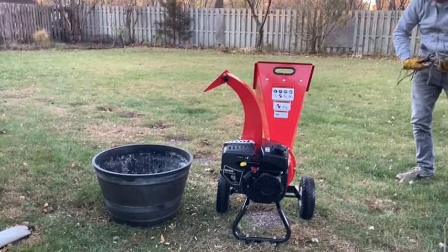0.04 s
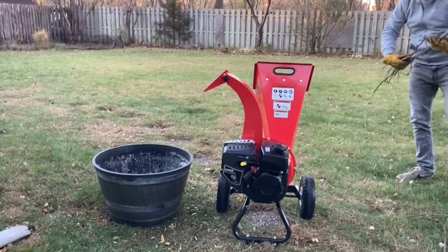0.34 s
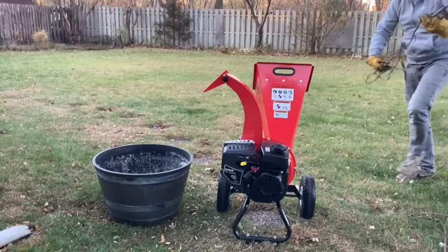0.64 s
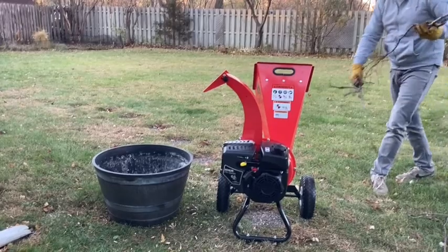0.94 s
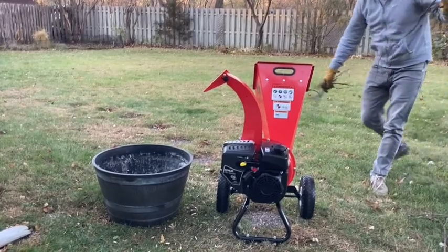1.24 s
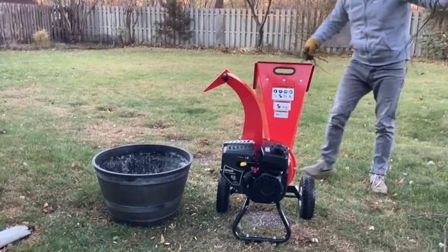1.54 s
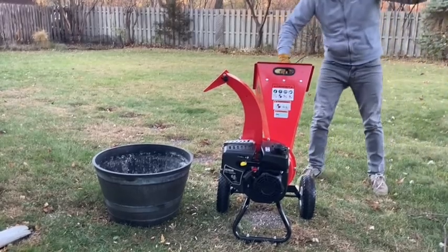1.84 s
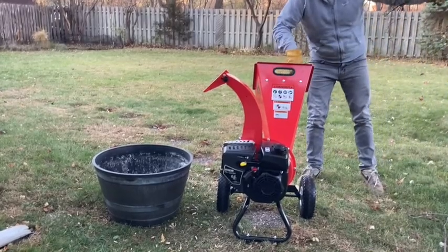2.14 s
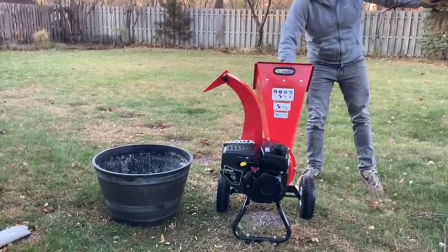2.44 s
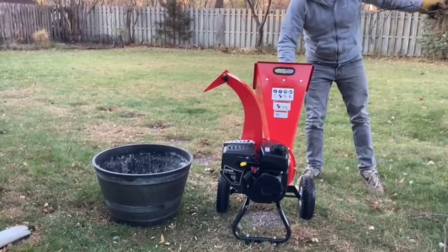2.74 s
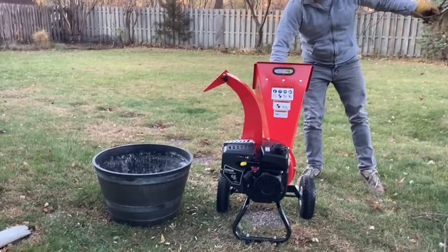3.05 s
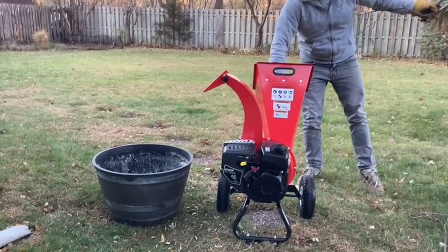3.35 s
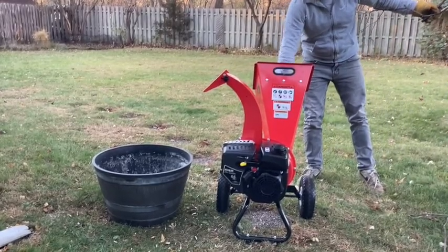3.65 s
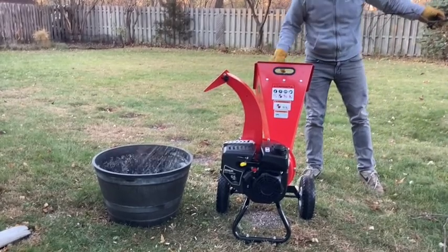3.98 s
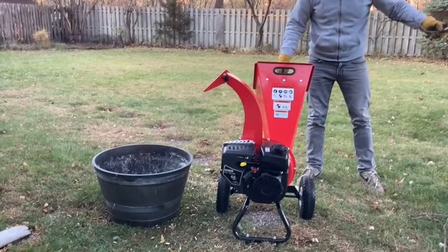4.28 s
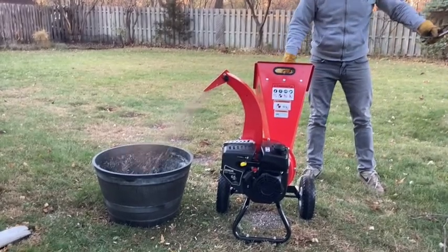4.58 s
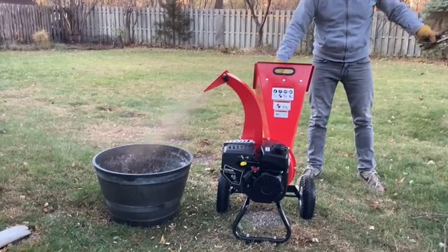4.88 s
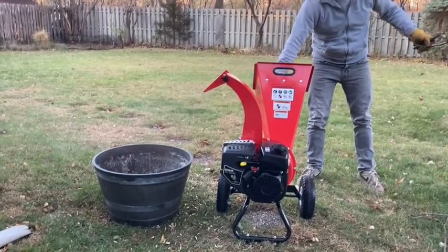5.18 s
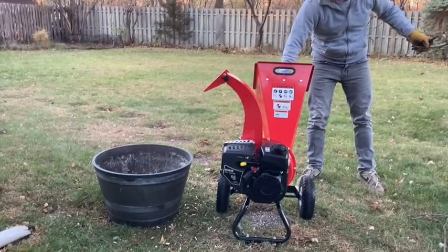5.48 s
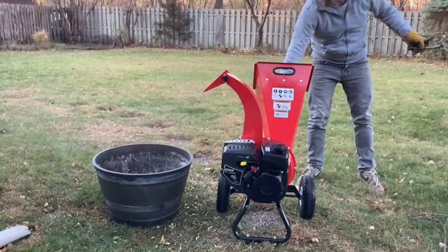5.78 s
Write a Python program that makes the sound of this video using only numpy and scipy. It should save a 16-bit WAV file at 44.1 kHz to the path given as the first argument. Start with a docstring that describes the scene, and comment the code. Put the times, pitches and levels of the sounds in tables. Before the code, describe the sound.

A small petrol wood chipper drones steadily, then cracks and shreds twigs in loud bursts, spraying chips through its steel chute.

```python
"""First comes the steady drone of a small single-cylinder petrol wood chipper, out on a lawn a few metres
from a two-port microphone. Shaft tones, rotor hum, rattling panels, valve ticks and hissing air all keep
time with one shaft. From about 3.7 s twigs go down the hopper: the knives crack and shred them, thick
ends knock in the housing, and chips spray and clang out through the steel chute. The engine sags under
the bites until the governor catches up, and the drone sinks after the heavy ones."""
import sys
import numpy as np
from scipy import signal
from scipy.fft import rfft, irfft
from scipy.io import wavfile

SR = 44100
rng = np.random.default_rng(int(sys.argv[2]) if len(sys.argv) > 2 else 0)


def digitize_waveform(pressure):
    """Quantize a signal to 16-bit integers and store it at the path in sys.argv[1].

    Rows of a 2-D input are taken as channels; values are limited to [-1, 1].
    """
    field = np.atleast_2d(pressure).T
    bounded = np.clip(field, -1, 1)
    quanta = np.round(bounded * 32767).astype(np.int16)
    wavfile.write(sys.argv[1], SR, quanta)


N = 265482
TIME, HZ = np.arange(N) / SR, np.fft.rfftfreq(N, 1 / SR)
GOVERNED_HZ = 64.03  # shaft turns a second

# Levels in the tables are relative: each layer and the microphone add their own gain.
# the governor hunts a little: t/s, offset from the governed speed/Hz
HUNTING = [(0, 0), (1.1, -.22), (1.35, .1), (2.7, .08), (3.0, 0)]
# rise and fall of the drone: t/s, level/dB
DRONE_LEVEL = [(0.0, -37), (0.03, -35), (3.72, -35), (3.87, -41), (3.95, -40.7), (4.05, -39), (4.13, -39.3),
               (4.17, -37.3), (4.24, -36.5), (4.29, -40.3), (4.5, -40.7), (4.6, -43.8), (5.36, -44),
               (5.43, -41), (5.65, -38.7), (6.02, -40)]
# tones of the shaft: multiple of shaft speed, level/dB
SHAFT_ORDERS = [(0.5, -62), (1, -40.3), (1.5, -47.7), (2, -43.4), (2.5, -41), (3, -51), (3.5, -58),
                (4, -38.2), (4.5, -57.5), (6.5, -58), (7.5, -57), (8.5, -58.5), (9, -59), (9.5, -53.5),
                (10, -46.6), (11.5, -61), (12, -57), (13, -60), (13.5, -60), (15, -49.8), (16, -45),
                (17, -63), (18, -50), (18.5, -62), (19, -59), (19.5, -60.5), (20, -56), (21, -59),
                (22.5, -59.5), (23, -62), (24, -58.5), (24.5, -58.5), (27, -51.5), (31, -67), (33, -60.5),
                (38, -63.5), (42, -67), (49.5, -68), (51.5, -70), (57, -67)]
# the rotor's hum swells and fades: t/s, level at 6 times shaft speed/dB, level at 8 times/dB
ROTOR_HUM = [(0, -42.5, -44.5), (0.3, -44.5, -43.5), (0.62, -49, -40.5), (0.85, -42.5, -41.5),
             (1.0, -40, -45.5), (1.12, -42.5, -46.5), (1.3, -39, -44), (1.55, -43, -40.5),
             (1.77, -44, -39.5), (1.87, -50.5, -39.5), (2.3, -58, -40.5), (3.0, -55, -41.5),
             (3.6, -51.5, -41.5), (3.95, -56.5, -46.5), (4.2, -48.5, -41.5), (4.65, -58.5, -50.5),
             (4.9, -58.5, -48.5), (5.15, -55.5, -42), (5.4, -55.5, -41), (5.7, -52.5, -43.5),
             (6.02, -56.5, -45.5)]
# spectrum of the rattling bodywork: f/Hz, level/dB
CLATTER_SPECTRUM = [(20, -53), (40, -15), (65, -8), (160, -4.5), (230, -5), (310, -10), (380, -6.5),
                    (470, -0.5), (600, -6.5), (850, -8.5), (1100, -11.5), (1600, -12.5), (2600, -22),
                    (3300, -19.5), (4600, -28), (9000, -32)]
# ringing of loose panels and guards: f/Hz, width/Hz, peak/dB
PANEL_MODES = [(1000, 110, 4), (1500, 260, 3), (2010, 140, 4.5), (2420, 130, 5.5)]
# ticks of valves and piston: place in the four-stroke cycle/cycles, level/dB
VALVE_TICKS = [(.02, -3), (.3, -5), (.43, -2), (.62, -2), (.67, 1), (.8, 0), (.89, -3)]
# spectrum of the air leaving the chute: f/Hz, level/dB
AIR_SPECTRUM = [(1500, -10.5), (4500, -3), (7000, -1), (8000, -4.5), (8650, 2.5), (9300, 3), (11500, -0.5),
                (13000, -0.5), (15800, -3)]
# bites of wood, heavy and light: t/s, length/s, spray/dB, cutting/dB, drumming/dB, drag on the shaft/Hz
BITES = [(3.656, 0.033, -39.5, -39, -53, 0), (3.694, 0.13, -28, -38, -39.5, 2),
         (3.851, 0.019, -33, -38.5, -48, .5), (3.885, 0.17, -44, -49, -57, -0.5),
         (4.081, 0.081, -35.5, -37.5, -47, 0), (4.135, 0.031, -28, -34, -36.5, 2.5),
         (4.186, 0.0757, -30.5, -36.5, -36.5, 3), (4.277, 0.071, -33.5, -38, -46, 1.45),
         (4.378, 0.071, -29.5, -35.5, -44.5, 1.45), (4.502, 0.063, -28, -35, -42, 2),
         (4.617, 0.059, -34, -43, -53, 0.5), (4.672, 0.081, -28, -35, -49, 3),
         (5.529, 0.094, -44.5, -52, -69, 0.5), (5.644, 0.16, -41, -46.5, -62, 0),
         (5.771, 0.059, -29, -34.5, -43.5, 1.2), (5.862, 0.039, -28, -32.5, -50, 0),
         (5.927, 0.042, -35.5, -40, -56.5, 1.5)]
# stray chips fly out in small puffs: t/s, level/dB
STRAY_CHIPS = [(3.955, -41), (4.97, -37.5), (5.06, -41), (5.31, -42.5)]
# spectra of spraying chips, cutting knives and the drumming housing: f/Hz, level/dB
SPRAY_SPECTRUM = [(1200, -41), (3500, -8), (6000, 3), (7000, 3.5), (8000, 3.5), (10500, 5.5), (11500, 3.5),
                  (14000, 3), (15800, -2.5)]
CUTTING_SPECTRUM = [(300, -39), (900, -4.5), (1500, -1.5), (2300, 0.5), (3400, 2), (4600, -3), (8000, -13)]
DRUMMING_SPECTRUM = [(30, -35), (70, -14), (150, -4), (250, -3), (350, -4), (480, -.5), (750, -3.5),
                     (1100, -7), (2200, -22)]
# ringing of the steel chute and hopper: f/Hz, width/Hz, peak/dB
STEEL_MODES = [(1480, 110, 6.5), (1640, 100, 4), (1950, 120, 3.5), (2110, 100, 4), (2400, 150, 2.5),
               (3180, 45, 9), (3430, 90, 6.5), (3660, 70, 5), (4120, 60, 5.5), (4710, 80, 3),
               (7800, 300, 5), (8600, 200, 2.5)]
# the hollow of the rotor housing: f/Hz, width/Hz, peak/dB
HOUSING_MODES = [(505, 55, 6), (440, 90, 1.5)]
# thick ends of wood knock in the housing: t/s, level/dB
KNOCKS = [(3.696, -20), (3.733, -26), (4.19, -31), (4.204, -24), (4.225, -32), (4.258, -20), (4.29, -28)]
# twigs snap on the knives: t/s, splinters/dB, crack/dB, ring f/Hz, ring level/dB
SNAPS = [(3.697, -31, -33, 2330, -33), (3.7397, -23, -33, 1385, -31), (3.766, -28, -35, 3450, -37),
         (3.782, -28, -35, 2370, -40), (3.7955, -32, -40, 1306, -30), (3.821, -22, -35, 2100, -40),
         (4.129, -28, -34, 1376, -23), (4.139, -24.5, -26.5, 1454, -28), (4.165, -31, -26, 1745, -31),
         (4.231, -20, -35, 2160, -33), (4.287, -19, -33, 2190, -32), (4.366, -18, -27, 1530, -32),
         (4.386, -29, -30, 3570, -35), (4.438, -30, -29, 1576, -26.5), (4.489, -19, -32, 3150, -38),
         (4.5183, -29, -35, 985, -27), (4.556, -31, -38, 1453, -28), (4.565, -19.5, -30, 3480, -29),
         (4.6982, -26, -29, 1474, -29.5), (4.721, -29, -33, 1510, -31), (4.742, -30, -31, 2020, -33),
         (5.7654, -24, -39, 1630, -37), (5.8072, -29, -31, 2400, -25), (5.814, -37, -35.5, 1646, -30),
         (5.875, -22, -37, 1560, -29), (5.8825, -34, -31, 2064, -27.5), (5.906, -26, -31, 1580, -37)]
# chunks of wood strike the chute: t/s, level/dB
CLANGS = [(4.37, -38), (4.438, -37), (4.492, -40), (4.529, -33), (4.567, -24), (4.728, -27), (5.772, -42),
          (5.904, -40)]
# phase between the microphone's ports below the treble: f/Hz, lead of the left/rad
PORT_PHASE = [(40, -.2), (150, -.14), (330, -.25), (520, -.78), (1000, -.6), (2000, -.95), (3000, -1.55),
              (4000, -1.7), (5200, -2.4), (6320, -3)]
# balance of the ports: f/Hz, left minus right/dB
PORT_BALANCE = [(60, 2.5), (110, 1.5), (200, .4), (380, 1.1), (700, -.7), (1200, -1.8), (2400, -1.4),
                (4400, -.5), (8000, 0)]


def amp(db):
    """Decibels to gain."""
    return 10 ** (np.asarray(db) / 20)


def unit_rms(x):
    """Scales to an rms of 1."""
    return x / np.sqrt(np.mean(x ** 2) + 1e-20)


def over_time(rows):
    """The columns of a table in time, one value a sample."""
    times, *columns = np.transpose(rows)
    return [np.interp(TIME, times, column) for column in columns]


def over_frequency(points):
    """A table over frequency, one value a bin."""
    hz, value = np.transpose(points)
    return np.interp(np.log(HZ + 1), np.log(hz + 1), value)


def colour(x, spectrum, modes=()):
    """A causal filter of unit power gain: a broad spectrum with resonances on top."""
    peaks_db = sum(peak / (1 + (2 * (HZ - hz) / width) ** 2) for hz, width, peak in modes)
    log_gain = np.log(unit_rms(amp(over_frequency(spectrum) + peaks_db)))
    minimum_phase = -signal.hilbert(np.r_[log_gain, log_gain[-2:0:-1]]).imag[:len(HZ)]
    return irfft(rfft(x) * np.exp(log_gain + 1j * minimum_phase), N)


def wander(rate_hz):
    """A smooth random drift with an rms of 1."""
    return unit_rms(irfft(rfft(rng.standard_normal(N)) / (1 + (HZ / rate_hz) ** 4), N))


def throb(cycles, depth):
    """A gain that jumps at the start of each cycle and then dies away."""
    return unit_rms(1 + depth * np.exp(-4 * (cycles % 1)))


def grains(per_s, spread_db, share):
    """Two unrelated streams of tiny uneven impacts; they carry `share` of the power, hiss the rest."""
    sizes = amp(spread_db * np.minimum(rng.exponential(1, N), 4))
    hits = rng.random(N) < per_s / SR
    impacts = unit_rms(sizes * hits * rng.choice([-1., 1.], (2, N)))
    return np.sqrt(share) * impacts + np.sqrt(1 - share) * rng.standard_normal((2, N))


def lag(x, seconds):
    """Follows x sluggishly, like something heavy."""
    keep = np.exp(-1 / (seconds * SR))
    return signal.lfilter([1 - keep], [1, -keep], x)


def shaft_speed(drag, inertia_s=.1896, governor_s=.14, governor_share=.9, waver_hz=.04):
    """Wood drags the heavy rotor down; the governor answers late and overshoots once the wood is gone."""
    sag = lag(drag, inertia_s)
    throttle = governor_share * lag(lag(sag, governor_s), governor_s)
    return GOVERNED_HZ - sag + throttle + over_time(HUNTING)[0] + waver_hz * wander(2.38)


def shaft_tones(turns, drone, jitter_turns=.0009, whine_order=21):
    """The engine's drone: one low thump a turn, and half orders from firing every second turn."""
    turns = turns + jitter_turns * wander(43)
    tones = np.zeros(N)
    for order, db in SHAFT_ORDERS:
        scatter = .02 * order ** 2 * rng.standard_normal()  # high orders are loose in phase
        phase = np.pi * (1 + order % 1) + scatter
        shake = amp((.2 + .06 * order) * wander(13.4))  # no two firings are alike
        level = drone ** 1.5 if order > whine_order else drone  # the whine sinks further than the drone
        tones += np.sqrt(2) * amp(db) * level * shake * np.cos(2 * np.pi * order * turns + phase)
    return tones


def rotor_hum(turns, waver_db=1.0):
    """The paddles of the rotor beat the air in the housing."""
    low_db, high_db = over_time(ROTOR_HUM)
    hum = np.zeros(N)
    for order, db in ((6, low_db + .6), (8, high_db - .3)):
        waver = unit_rms(amp(waver_db * wander(25)))
        hum -= np.sqrt(2) * amp(db) * waver * np.cos(2 * np.pi * order * turns)
    return hum


def panel_clatter(turns, level_db=-38):
    """Loose panels and guards rattle at random, shaken twice a turn."""
    rattle = grains(per_s=2200, spread_db=2, share=.4) * throb(2 * turns, depth=.5)
    return amp(level_db) * unit_rms(colour(rattle, CLATTER_SPECTRUM, PANEL_MODES))


def valve_ticks(turns, level_db=-51, tick_s=.0019, alike=.89, lowest_hz=1900):
    """Hard ticks of the valve gear, nearly the same in every cycle: the buzz on top of the drone."""
    cycle, cycle_s = turns / 2, 2 / GOVERNED_HZ
    strikes = sum(amp(db) * np.exp(-((cycle - place) % 1) * cycle_s / tick_s)
                  for place, db in VALVE_TICKS)
    places = np.arange(1024) / 1024
    patterns = rng.standard_normal((2, len(places)))
    repeated = unit_rms(np.array([np.interp(cycle, places, pattern, period=1) for pattern in patterns]))
    ticks = strikes * (np.sqrt(alike) * repeated + np.sqrt(1 - alike) * rng.standard_normal((2, N)))
    ticks = signal.sosfilt(signal.butter(3, lowest_hz, "high", fs=SR, output="sos"), ticks)
    return amp(level_db) * unit_rms(colour(ticks, CLATTER_SPECTRUM, PANEL_MODES))


def air_hiss(turns, level_db=-45.5, flutter_db=1.36):
    """Air and dust hiss out of the chute, pulsing with the engine cycle."""
    hiss = grains(per_s=4000, spread_db=.56, share=.15) * throb(turns / 2, depth=.31)
    flutter = amp(flutter_db * wander(30))
    return amp(level_db) * colour(hiss * flutter, AIR_SPECTRUM)


def bite(start, length, catch_db_per_s=793, empty_db_per_s=337.5):
    """The gain of one bite: it builds as the knives catch, holds, and dies as the housing empties."""
    catching = catch_db_per_s * np.maximum(start - TIME, 0)
    emptying = empty_db_per_s * np.maximum(TIME - start - length, 0)
    return amp(-np.minimum(catching + emptying, 120))


def wood_feed():
    """Wood goes down the hopper: gains of spray, cutting and drumming, and the drag on the shaft."""
    rows = np.array(BITES)
    shapes = np.array([bite(start, length) for start, length in rows[:, :2]])
    gains, drags = amp(rows[:, 2:5].T), rows[:, 5]
    spray, cutting, drumming = np.sqrt(gains ** 2 @ shapes ** 2)  # overlapping bites add in power
    strays = sum(amp(db) * bite(start, length=.015) for start, db in STRAY_CHIPS)
    return np.hypot(spray, strays), cutting, drumming, drags @ shapes


def chute_echoes(x, ring_s, wet_db=0, spots=9, landing_s=.026):
    """Clump after clump lands somewhere in the chute; each spot has its own echoes off the steel walls."""
    t = TIME[:SR // 20]
    tails = rng.standard_normal((spots, 2, len(t))) * np.exp(-t / ring_s)
    tails /= np.linalg.norm(tails, axis=2, keepdims=True)
    spot = rng.integers(0, spots, N)[(TIME / landing_s).astype(int)]
    wet = sum(signal.oaconvolve(x * (spot == k), tail, axes=1)[:, :N] for k, tail in enumerate(tails))
    return (x + amp(wet_db) * wet) / np.hypot(1, amp(wet_db))


def shredding(turns, spray, cutting, drumming, clump_db=2, crunch_db=.5):
    """The knives chop once a turn; the housing drums and clumps of chips pelt the chute."""
    clumps = wander(37)
    chips = grains(per_s=3500, spread_db=2.5, share=.31) * spray * unit_rms(amp(clump_db * clumps))
    chips = chute_echoes(chips * throb(turns, depth=.18), ring_s=.0042, wet_db=-1)
    cuts = grains(per_s=1100, spread_db=2.4, share=.55) * cutting * unit_rms(amp(crunch_db * clumps))
    cuts = chute_echoes(cuts * throb(turns, depth=.11), ring_s=.017)
    thuds = grains(per_s=350, spread_db=.62, share=.65) * drumming * throb(turns, depth=.36)
    return (amp(-2) * colour(chips, SPRAY_SPECTRUM, STEEL_MODES)
            + amp(-2) * colour(cuts, CUTTING_SPECTRUM, STEEL_MODES)
            + amp(2.5) * colour(thuds, DRUMMING_SPECTRUM, HOUSING_MODES))


def wood_blows(blows, modes, rise_s):
    """Each blow of wood rings the modes of the housing or chute; narrow modes last longest."""
    t = TIME[:SR // 8]
    hz, width, db = np.transpose(modes)[:, :, None]
    decays = amp(db) / np.linalg.norm(amp(db)) * np.exp(-np.pi * width * t)
    attack = 1 - np.exp(-t / rise_s)
    out = np.zeros(N + len(t))
    for start, blow_db in blows:
        rings = decays * np.sin(2 * np.pi * (hz * t + rng.random(hz.shape)))
        out[round(start * SR):][:len(t)] += amp(blow_db) * attack * rings.sum(0)
    return out[:N]


def twig_snaps(crack_s=.008, flight_s=.002, splinter_s=.009, stub_s=.014, twig_q=13):
    """A twig cracks, its splinters strike the steel, and its stub shudders on the knife at its own pitch."""
    t = TIME[:SR // 8]
    attack = 1 - np.exp(-t / .0004)
    splinter_shape = (1 - np.exp(-t / flight_s)) * np.exp(-t / splinter_s)
    splinters, cracks, stubs = np.zeros((3, 2, N + len(t)))
    for start, splinter_db, crack_db, ring_hz, ring_db in SNAPS:
        span = slice(round(start * SR), round(start * SR) + len(t))
        phase_walk = np.cumsum(rng.standard_normal((2, len(t))), 1)  # rough wood holds no pure pitch
        slip = np.sqrt(2 * np.pi * ring_hz / twig_q / SR) * phase_walk
        ring = unit_rms(np.sin(2 * np.pi * ring_hz * t + slip))
        splinters[:, span] += amp(splinter_db) * splinter_shape
        cracks[:, span] += amp(crack_db) * attack * np.exp(-t / crack_s)
        stubs[:, span] += amp(ring_db) * attack * np.exp(-t / stub_s) * ring / 2
    burst = chute_echoes(splinters[:, :N] * grains(per_s=9000, spread_db=1.7, share=.5), ring_s=.004)
    crunch = chute_echoes(cracks[:, :N] * grains(per_s=3000, spread_db=1.3, share=.5), ring_s=.004)
    return (amp(-.8) * colour(burst, SPRAY_SPECTRUM, STEEL_MODES)
            + amp(-1.5) * colour(crunch, CUTTING_SPECTRUM, STEEL_MODES) + stubs[:, :N])


def port_phase(agree_hz=8020, cycle_hz=3400, linger=.45):
    """The left port's lead in radians; in the treble it turns on, lingering where ports agree or oppose."""
    turn = 2 * np.pi * (HZ - agree_hz) / cycle_hz
    return np.where(turn < -np.pi, over_frequency(PORT_PHASE), turn - linger * np.sin(2 * turn))


def microphone(direct, diffuse, likeness):
    """Left and right from two close ports: mid and side trade strength as the phase between them turns."""
    half_phase = port_phase() / 2
    mid = np.cos(half_phase) * rfft(direct)
    side = 1j * np.sin(half_phase) * rfft(likeness * direct + np.sqrt(1 - likeness ** 2) * diffuse)
    lean = amp(over_frequency(PORT_BALANCE) / 2)
    return irfft(np.array([(mid + side) * lean, (mid - side) / lean]), N)


def scene():
    """Tones and single blows reach the microphone directly, the noises from all over the machine."""
    spray, cutting, drumming, drag = wood_feed()
    turns = np.cumsum(shaft_speed(drag)) / SR
    drone_db = over_time(DRONE_LEVEL)[0]
    drone = amp(drone_db - np.median(drone_db[:N // 2]))  # gain of 1 while the machine runs empty
    tones = shaft_tones(turns, drone) + rotor_hum(turns)
    running = drone * (panel_clatter(turns) + valve_ticks(turns) + air_hiss(turns))
    chipping = shredding(turns, spray, cutting, drumming) + twig_snaps()
    clangs = wood_blows(CLANGS, STEEL_MODES, rise_s=.00085)
    knocks = wood_blows(KNOCKS, HOUSING_MODES, rise_s=.0021)
    direct = microphone(tones + knocks + clangs, diffuse=0, likeness=.81)
    scattered = microphone(*(running + chipping), likeness=.58)
    return direct + scattered


def record(dry, edge_hz=15850):
    """The recorder's band limit."""
    lowpass = signal.firwin(711, edge_hz, window=("kaiser", 9), fs=SR)
    return signal.oaconvolve(dry, lowpass[None], "same")


dry = scene()
out = record(dry)
digitize_waveform(out)
```